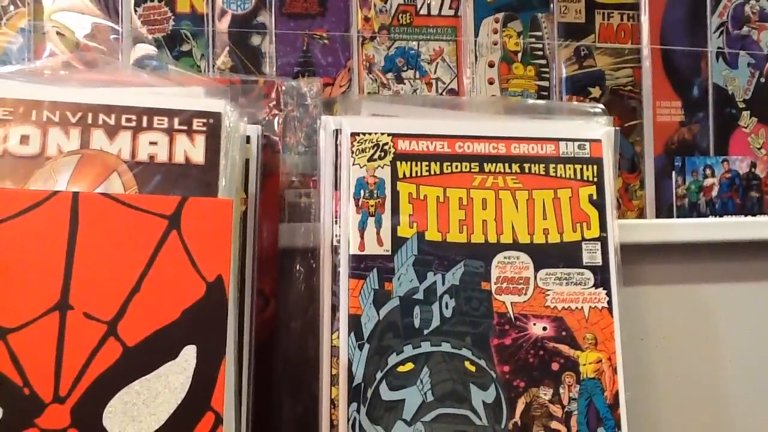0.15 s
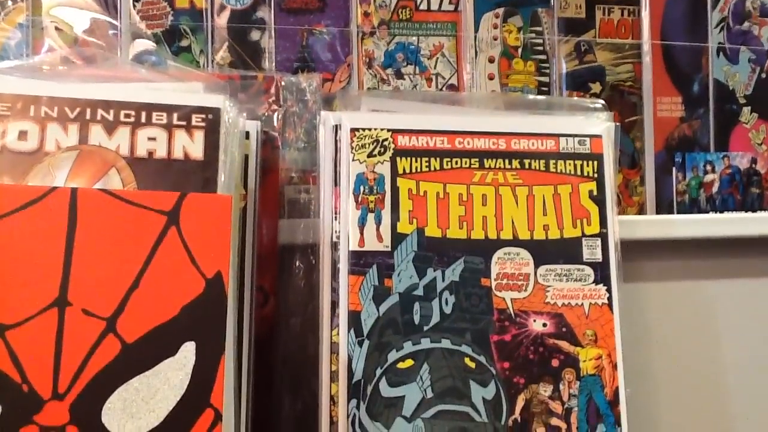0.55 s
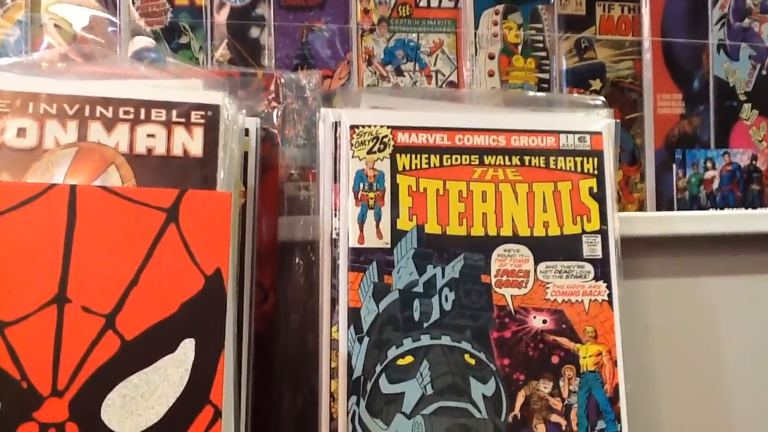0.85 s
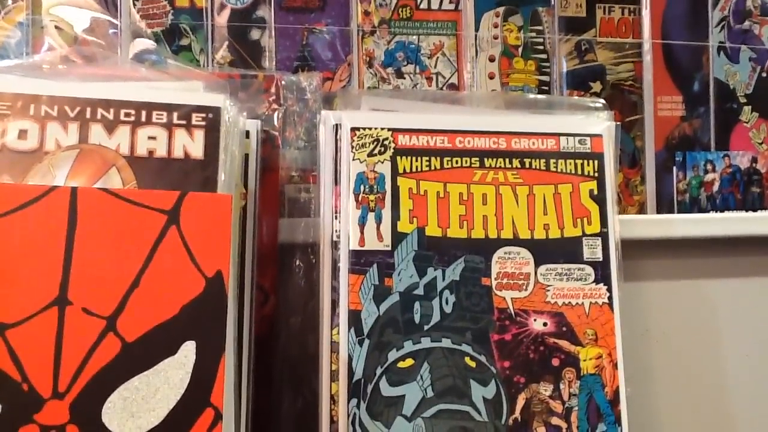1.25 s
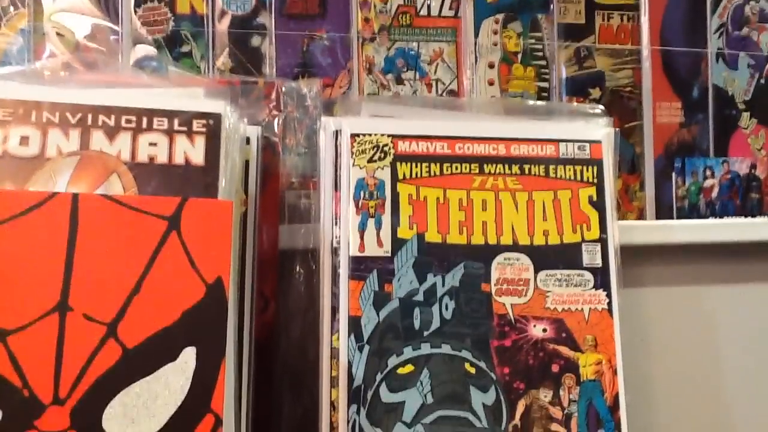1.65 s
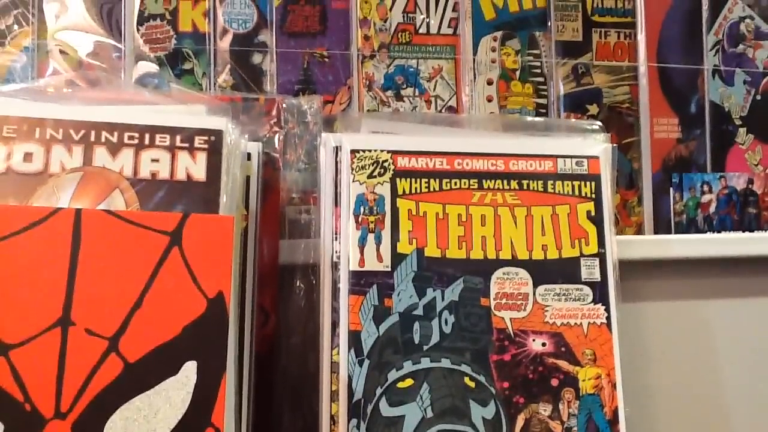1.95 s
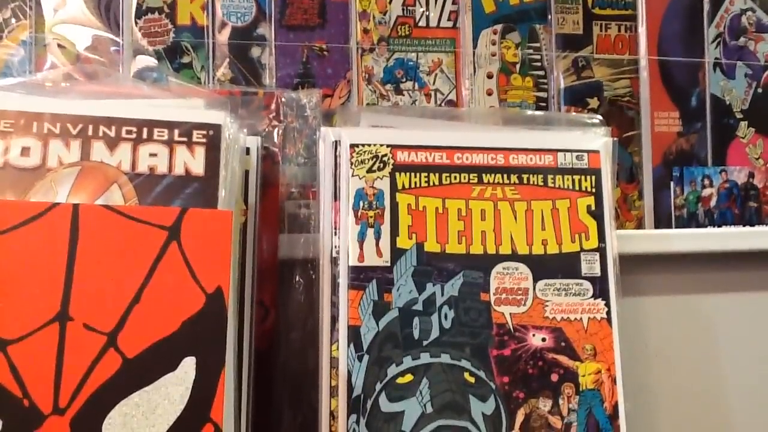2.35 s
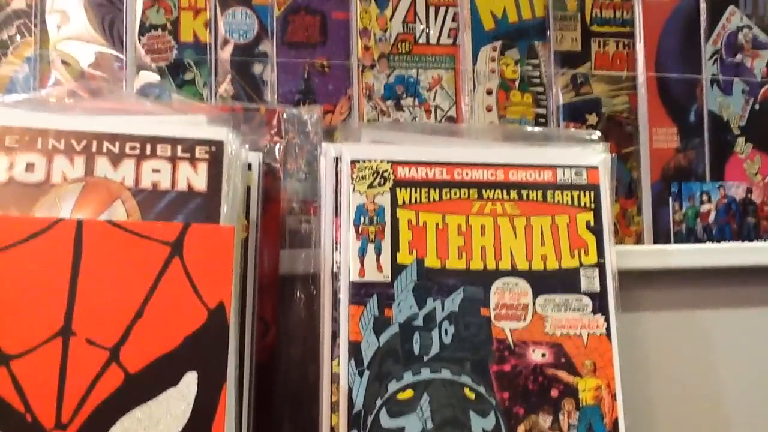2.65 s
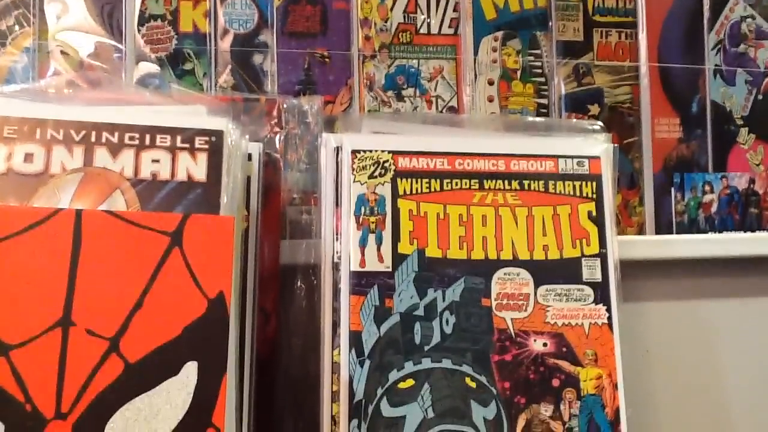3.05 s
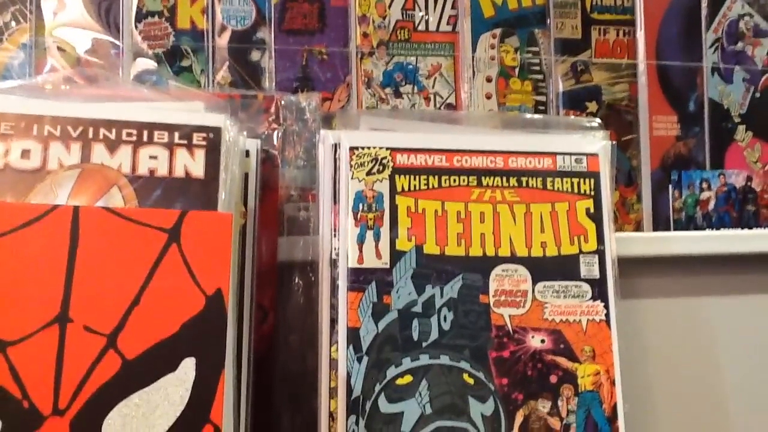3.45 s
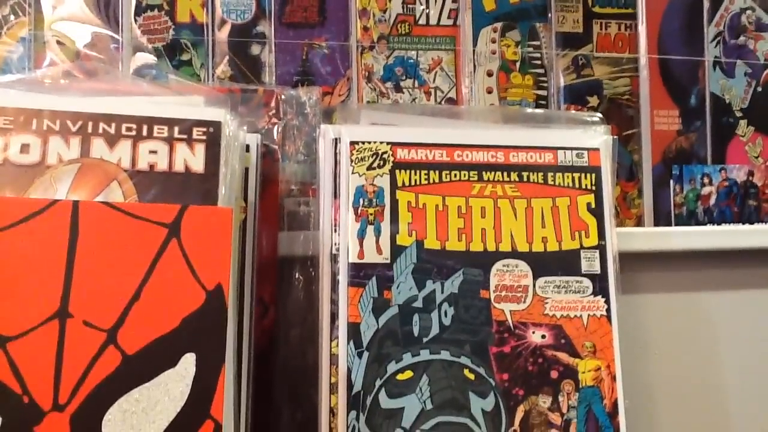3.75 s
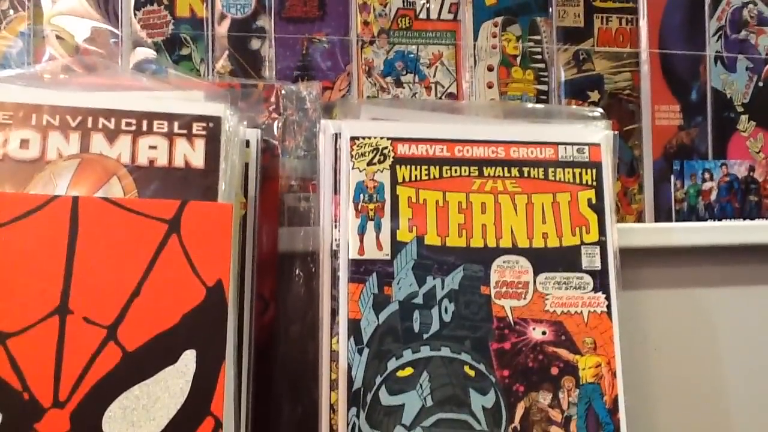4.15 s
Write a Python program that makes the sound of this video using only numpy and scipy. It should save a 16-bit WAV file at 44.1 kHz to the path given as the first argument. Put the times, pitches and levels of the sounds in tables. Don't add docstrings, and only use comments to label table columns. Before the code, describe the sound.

Thin plastic film peels open with hard, sharp snaps and brittle crackles in the first second, then sparse faint rustles, then busier crinkling over a soft hum.

```python
import sys
import numpy as np
from scipy import signal
from scipy.fft import rfft, irfft
from scipy.io import wavfile
from scipy.ndimage import uniform_filter1d

SR = 44100
rng = np.random.default_rng(int(sys.argv[2]) if len(sys.argv) > 2 else 0)


def boost(x):
    u = np.asarray(x, float) / 20
    return 10 ** u


def put_to_file(sound):
    columns = np.atleast_2d(sound).T
    safe = np.clip(columns, -1, 1)
    whole_steps = np.round(safe * 32767)
    wavfile.write(sys.argv[1], SR, whole_steps.astype(np.int16))


N = 189100

# frequency in Hz, density in dB per Hz.
AIR_SPECTRUM = [(25, -41), (70, -34.5), (150, -17.5), (200, -18.5), (260, -6.5), (340, -17.5), (430, -14),
                (520, -28), (900, -32.5), (2000, -38), (4000, -41), (15200, -39)]
AIR_DB = -56
# frequency in Hz, level in dB, wander of the pitch in Hz.
HUM_TONES = [(269, -51, .4), (240, -61.5, .4)]
HUM_WAVER_DB = 1.2
# low edge in Hz, high edge in Hz, level in dB.
MIDDLE_PATCHES = [(2356, 3400, -4.5), (3160, 4980, -1), (4500, 6270, -1), (5250, 5500, -10.5)]
TREBLE_PATCHES = [(6780, 9020, 0.9), (8700, 11600, -2.1), (10920, 13500, -1.5), (13000, 20000, -1.5)]
BODY_PATCHES = [(300, 470, 1.3), (470, 730, 4.0), (794, 1390, 1.0), (1310, 2800, 0.89)]
# start in seconds,
# hold in seconds, rustle level in dB, treble in dB re middle, body in dB re middle.
FLAP_STROKES = [(0, 0.19, -61, 1, 1), (0.236, 0.071, -54.5, -0.5, -6), (0.308, 0.018, -61, 1, -5),
                (0.333, 0.15, -49.5, 3, -9.5), (0.48, 0.096, -53, 5, -4.5), (0.523, 0.015, -48, 1, -15),
                (0.575, 0.06, -61, 1, -13), (0.656, 0.052, -71.5, -18, 3), (0.721, 0.019, -55, -8, 1),
                (0.855, 0.025, -60, 7, -6), (0.912, 0.032, -67.5, 1, -2), (0.947, 0.018, -72, -6, 5),
                (0.996, 0.031, -59.5, 1, -18), (1.203, 0.018, -61.5, -6.5, -3),
                (1.291, 0.038, -67.5, -4, -5.5), (1.348, 0.026, -58, -7, -6.5),
                (1.47, 0.048, -54.5, -22, -14), (1.523, 0.055, -61.5, -0.5, -17),
                (1.714, 0.065, -59, -3.5, -5.5), (1.786, 0.031, -66, -4, -4), (1.824, 0.035, -65, -2, -1),
                (1.89, 0.012, -55.5, -2.5, -9.5), (2.009, 0.014, -63, -0.5, -1)]
SLEEVE_STROKES = [(2.196, 0.015, -71, -13, -13.5), (2.276, 0.01, -63.5, -3.5, -19),
                  (2.334, 0.016, -62.5, -2, -10), (2.416, 0.012, -68, -1, -14),
                  (2.474, 0.0064, -56.5, -9, -10), (2.508, 0.018, -59.5, -6, -9.5),
                  (2.557, 0.014, -68, -8, -9), (2.58, 0.01, -60, -5, -8), (2.651, 0.0061, -64.5, -4, -24),
                  (2.738, 0.0056, -59.5, 1, -8), (2.788, 0.2, -73, 4.5, 0.5), (3.046, 0.061, -54.5, 1, -3),
                  (3.147, 0.032, -58, -1, 8), (3.218, 0.015, -59, 2, 11), (3.243, 0.044, -55, 6.5, -9),
                  (3.361, 0.027, -54.5, 0.5, -4), (3.44, 0.069, -60, -0.5, -1), (3.53, 0.045, -71, 8.5, 7),
                  (3.652, 0.064, -62.5, 1, 4), (3.739, 0.073, -65, 2, 2.5), (3.852, 0.04, -58.5, 1, 0.5),
                  (3.938, 0.061, -59.5, 3, 0.5), (4.015, 0.045, -56, 3.5, -19),
                  (4.076, 0.067, -65.5, 4.5, 2), (4.148, 0.013, -50, -8, -12), (4.18, 0.11, -61.5, 1, -4)]
# levels of middle, treble and body in dB.
REST_LEVELS_DB = [-70, -83, -88.5]
# start in seconds, level in dB, t60 in seconds.
SHIVERS = [(0.578, -38, 0.027), (0.6108, -51, 0.079), (0.722, -39, 0.037), (0.8544, -42, 0.079),
           (.999, -32, 0.087), (1.189, -58, .05), (1.431, -61, 0.032), (2.302, -57.5, .05),
           (2.368, -49, 0.065), (2.404, -47.5, 0.047), (2.427, -55, 0.047), (3.869, -44.5, 0.045),
           (3.964, -37.5, 0.031), (4.177, -42, 0.044), (4.024, -46, .04)]
# time of the peak in seconds, peak in dB, frequency in Hz.
TAPS = [(.049, -51, 162), (.0578, -48.5, 1630), (.124, -49, 402), (.262, -31.5, 1380), (.29, -52, 400),
        (.315, -39, 424), (.335, -48, 1290), (.353, -47, 400), (.367, -59, 162), (.492, -50, 180),
        (.495, -59, 700), (.549, -53, 397), (.613, -58, 160), (0.661, -53, 162), (.722, -37.5, 1220),
        (.9962, -29, 1150), (.731, -57, 164), (.844, -43, 1320), (0.8546, -40, 912), (.855, -25.5, 1460),
        (.966, -53, 710), (0.9971, -41, 374), (1.024, -50, 1300), (1.366, -54.5, 705), (2.297, -50, 402),
        (2.315, -53, 407), (2.408, -56, 705), (2.431, -56, 950), (3.045, -46.5, 1050), (3.069, -53, 450),
        (3.132, -52, 1300), (3.161, -51, 1110), (3.189, -50, 1090), (3.209, -54, 694), (3.226, -48, 900),
        (3.233, -46, 596), (3.241, -50, 1000), (3.176, -47, 560), (3.324, -55, 700), (3.343, -51.5, 1200),
        (3.424, -54, 700), (3.563, -49.5, 1620), (3.695, -49, 1200), (3.791, -48, 704), (3.889, -42.5, 388),
        (3.889, -45, 704), (3.891, -42.5, 204), (3.936, -50, 362), (3.968, -55, 160), (3.98, -44.5, 410),
        (4.01, -57, 420), (4.006, -47.5, 169), (4.043, -44, 168), (4.05, -40, 330), (4.069, -50, 390),
        (4.078, -45, 403), (4.084, -48.5, 131), (4.135, -49, 990), (4.155, -40.5, 750), (4.272, -55, 450)]
# time in seconds, peak in dB, ring in Hz, treble in dB re middle, body in dB re middle.
PEELING_SNAPS = [(0.2406, -24.5, 6700, 6, 14), (0.2617, -19, 3240, -12.5, -10),
                 (0.2647, -19.5, 6360, -10.5, -4), (0.3404, -17, 4330, -13, -1.5),
                 (0.367, -19.5, 5500, 8, -21), (0.4016, -17.5, 3550, -10, -3.5),
                 (0.4067, -18, 4080, -7.5, 3.5), (0.4688, -16, 8640, 7, -10), (0.474, -18, 2630, -10, -7),
                 (0.5346, -26, 5040, -8, 5), (.557, -4.5, 4700, -5.5, -12.5),
                 (0.5792, -5.5, 5250, -12.5, -6), (0.6085, -1, 5330, -5.5, -8.5),
                 (0.6117, -19.5, 7570, 10, -18), (.659, -26, 2440, -15.5, 0.5),
                 (0.7206, -1, 5760, -1.5, -25.5), (0.7253, -18, 6060, 1, -9),
                 (0.7799, -32, 4360, -15.5, -15), (0.8523, -15, 8300, 2.5, -21.5),
                 (0.8538, -7, 3100, -4.5, -5), (0.8535, 1.5, 12100, -3, -8), (0.9961, 1, 3400, -8, -10.5),
                 (0.9972, -10.5, 5500, -11, -8), (0.9981, -9, 5220, -4, -8.5),
                 (0.9978, -1.5, 4560, -8.5, -12.5), (1.0032, -2.5, 3380, -9.5, -22.5),
                 (1.4513, -19.5, 8050, -7, -35)]
OPENING_SNAPS = [(3.0987, -21, 3140, -11, -1.5), (3.1178, -23.5, 4070, -3, -5), (3.155, -15, 4200, -4, 4.5),
                 (3.3059, -14.5, 5800, -7, -1.5), (3.369, -23, 5330, 1, 2), (3.4105, -22, 2300, -13, -2),
                 (3.413, -14.5, 6900, 2, -1.5), (3.4423, -18, 2440, -2, -4), (3.458, -23.5, 7490, 0, 2),
                 (3.5108, -25.5, 4730, -13, -9), (3.7798, -25, 5360, -1, -24), (3.8604, -22, 2900, -7, -16),
                 (3.8674, -13.5, 7260, -3.5, -2), (3.963, -13.5, 7850, -2.5, -1.5),
                 (3.9668, -23.5, 3170, -21, -2), (4.0235, -19.5, 6650, -5.5, -4),
                 (4.0254, -21, 5400, -2, -29), (4.0504, -26, 7670, 13, 5), (4.1347, -11.5, 6900, 2, -10),
                 (4.14, -25, 8800, 7, -13), (4.147, -15, 5140, -6, -18), (4.1496, -12.5, 2950, -5, 1),
                 (4.153, -16, 5700, 1, 5), (4.1758, -15.5, 6240, 3, 2)]
FURTHER_SLIPS = [(0.261, -21.5, 5700, -14, -8), (0.2617, -15, 3580, -4, -10), (.264, -24.5, 2030, -13, 5),
                 (.4010, -24, 3470, -15, -6), (.5869, -29, 9000, 6, -8), (0.8518, -11, 4970, -4, -18),
                 (1.0307, -42, 4500, -9, -11), (1.5372, -40.5, 3520, -17, -17), (1.9028, -44, 9000, 3, -14),
                 (2.368, -50, 9000, 3, -14), (3.073, -27, 5500, -2, -10), (3.079, -36, 3300, -7, -12),
                 (3.0973, -26.5, 5000, -8, -20), (3.1547, -22.5, 5100, -8, -6),
                 (3.1829, -41, 3500, -12, -8), (3.229, -38, 6500, 1, -17), (3.2896, -41, 9000, 6, -14),
                 (3.3906, -37, 4500, -4, -10), (3.8875, -43, 8000, 2, 6), (4.0316, -35, 6500, -1, -14),
                 (4.1567, -25, 4000, -8, -10), (4.1845, -36, 5000, -4, -10), (4.214, -38, 3520, -12, -10),
                 (4.2464, -36, 5500, -8, -12)]
# time in seconds, peak in dB, ring in
# Hz, treble in dB re middle.
GLUE_TICKS = [(0.0576, -42, 1910, -10), (0.324, -28, 2870, -6), (0.3902, -35, 4090, -14),
              (0.3982, -29, 5700, -10), (0.4098, -22.5, 7600, -14), (0.4777, -29, 3570, -12),
              (.489, -27.5, 3300, -15), (0.542, -25, 4900, -19), (0.5455, -17, 5340, -4),
              (0.548, -23, 7320, -4), (0.582, -12, 5990, 5), (0.714, -38.5, 2860, -19),
              (0.7287, -21, 4520, 6), (0.7565, -28, 2670, -5), (0.8358, -26, 2390, -10.5),
              (0.8433, -32, 2900, -18), (0.861, -16, 9100, 14), (0.9658, -44, 2600, -20),
              (1, -11.5, 6100, 10), (1.074, -40.5, 4970, -4.5), (1.1396, -36.5, 3450, -28),
              (1.209, -37, 2840, 1), (1.4162, -41, 4000, -20), (1.4302, -24.5, 2760, 1),
              (1.457, -31.5, 2630, -6), (1.4663, -32, 3680, -35), (1.8315, -40, 6550, -19),
              (1.852, -41, 6000, -11), (1.9055, -29.5, 2710, 4), (2.828, -42, 2980, -12)]
CREASE_TICKS = [(2.3697, -49, 4500, -12), (2.4027, -28, 8000, -16), (2.406, -28, 6340, -1),
                (2.431, -40, 4720, -9), (2.4809, -33, 3450, -4), (3.4232, -33, 3010, -20),
                (3.6888, -35, 4330, -11), (3.039, -35, 4670, -11), (3.0506, -27, 6370, -11.5),
                (3.0705, -24, 6420, -1), (3.109, -34, 7240, 2), (3.158, -25, 7140, 2),
                (3.1725, -33.5, 3550, -24), (3.254, -28.5, 3340, -3), (3.4781, -26.5, 4260, -54),
                (3.4842, -32, 4580, -8), (3.661, -28, 4300, -6.5), (3.8634, -26, 4400, 1),
                (3.3227, -32.5, 3140, -13), (3.9454, -32.5, 8700, -14), (3.972, -27, 2900, 1),
                (3.9997, -26, 6630, -6), (4.053, -28, 5250, -3), (4.081, -31.5, 4800, -20),
                (4.169, -25, 6500, -8), (4.1806, -28.5, 2680, -21), (4.2106, -24, 4760, -1),
                (4.2328, -27.5, 4840, -6), (4.2393, -30.5, 3550, -10), (4.2434, -21, 5770, -4),
                (.959, -48, 3030, -24), (.7343, -21.5, 4500, -5), (.7545, -38, 3000, -12),
               (0.7603, -33, 4500, -8.5), (1.19, -41, 6000, 1), (1.2658, -47, 5000, -10.5),
               (1.364, -48, 4000, -10), (1.4193, -30.5, 6000, -5), (1.4215, -41, 4000, -10),
               (1.447, -44, 3500, -22), (1.464, -39, 4000, -19), (1.7892, -42, 3990, -8),
               (2.3033, -44, 3940, -7.5), (2.5274, -48, 4500, -8), (2.6104, -43, 6000, 4),
               (2.736, -42, 4500, -7), (3.132, -41, 3970, -11), (3.6956, -36, 4500, -16),
               (4.223, -36, 7000, -3), (4.2872, -46, 5050, -3)]
# frequency in Hz, t60 in seconds.
ROOM_DECAY = [(300, 0.23), (1500, 0.048), (4000, 0.03), (12000, 0.079)]
# time in seconds, level in dB, frequency in Hz, # t60 in
# seconds.
KNOCKS = [(0.265, -30, 300, 0.032), (0.314, -25, 1020, 0.012), (.405, -27, 610, 0.016),
          (.471, -32, 722, 0.023), (.718, -32, 584, 0.023), (0.579, -34, 280, 0.021),
          (.852, -34.5, 346, 0.031), (0.9948, -20.5, 594, 0.017), (1.016, -36.5, 246, 0.054),
          (1.211, -43, 246, 0.046), (1.452, -52.5, 574, 0.05), (1.8, -56, 419, 0.13),
          (1.87, -54, 332, 0.24), (2.305, -53.5, 289, 0.091), (2.31, -57, 587, 0.062),
          (2.479, -49, 432, 0.044), (3.153, -47, 610, 0.043), (3.17, -55, 930, 0.11),
          (3.222, -57, 596, 0.048), (3.235, -51, 1066, 0.07), (3.76, -37, 285, 0.026),
          (3.86, -28.5, 956, 0.016), (3.962, -51, 605, 0.017), (3.99, -57, 196, 0.26),
          (4.006, -37.5, 280, 0.052), (4.04, -51, 381, 0.18), (1.92, -51, 373, .1),
          (4.043, -43, 270, 0.062), (4.064, -42.5, 318, 0.06), (4.17, -58.5, 411.5, 1),
          (4.269, -34, 736, 0.019)]
# dB lost per dB of excess, recovery time in seconds.
DUCK_RECOVERY = [(0.299, 0.1), (0.421, 0.96)]

LEAD = 90
FIRM_DB = -55


def evened(x):
    return x / np.sqrt(np.mean(x ** 2) + 1e-20)


def read(points, hz):
    f, value = np.transpose(points)
    return np.interp(np.log(hz + 1), np.log(f + 1), value)


def add(mix, s, sound):
    part = mix[max(round(s * SR), 0):][:len(sound)]
    part += sound[:len(part)]


def band(x, lo_hz, hi_hz, order=2):
    edges = [lo_hz, min(hi_hz, 0.49 * SR)]
    return signal.sosfilt(signal.butter(order, edges, "band", fs=SR, output="sos"), x)


def slow(hz):
    lowpass = signal.butter(2, hz, fs=SR, output="sos")
    return evened(signal.sosfilt(lowpass, rng.standard_normal(N + SR))[SR:])


def air():
    shape = boost(read(AIR_SPECTRUM, np.fft.rfftfreq(N, 1 / SR)))
    noise = irfft(rfft(rng.standard_normal(N)) * shape, N)
    return boost(AIR_DB + 1.0 * slow(1.2)) * evened(noise)


def hum():
    out = np.zeros(N)
    for hz, db, wander_hz in HUM_TONES:
        level = np.sqrt(2) * boost(db + HUM_WAVER_DB * slow(2.9))
        phase = 2 * np.pi * np.cumsum(hz + wander_hz * slow(19.0)) / SR
        out += level * np.sin(phase)
    return out


def grains(per_s, spread_db, hiss):
    happens = rng.random(N) < per_s / SR
    size = boost(spread_db * np.minimum(rng.exponential(1, N), 4.2)) * happens
    return evened(size * rng.standard_normal(N)) + hiss * rng.standard_normal(N)


def patches(bands, clumps_db):
    total = np.zeros(N)
    for lo_hz, hi_hz, db in bands:
        swell = boost(db + 2.2 * slow(24.0) + clumps_db)
        total += swell * evened(band(grains(1500, 1.1, 1.0), lo_hz, hi_hz))
    return evened(total)


def strokes():
    rise_db_per_s, fall_db_per_s = 1298.5, 650.5
    linger_s = 0.049
    t = np.arange(0, N, 64) / SR
    power = boost(np.array(REST_LEVELS_DB)[:, None] + ducking_db()[::64]) ** 2
    for s, hold_s, db, treble_db, body_db in FLAP_STROKES + SLEEVE_STROKES:
        swell_db = -rise_db_per_s * np.maximum(s - t, 0)
        decay_db = -fall_db_per_s * np.maximum(t - s - hold_s, 0)
        shape_db = (swell_db + decay_db) / (1 + hold_s / linger_s)
        levels_db = db + np.array([[0], [treble_db], [body_db]])
        power = power + boost(levels_db + np.maximum(shape_db, -200)) ** 2
    for s, db, t60 in SHIVERS:
        levels_db = db + np.array([[0], [-2.0], [-12.0]])
        power = power + (t >= s) * boost(levels_db - 60 * np.clip(t - s, 0, 1) / t60) ** 2
    return [np.interp(np.arange(N) / SR, t, np.sqrt(row)) for row in power]


def crackle(level):
    per_s, mean_db, spread_db = 320, 2.5, 5.5
    firmness = (level / boost(FIRM_DB)) ** 0.19
    size = level * firmness * boost(mean_db + spread_db * np.minimum(rng.exponential(1, N), 1.8))
    size *= rng.random(N) < per_s / SR
    rings_hz = np.geomspace(2400, 7000, num=12)
    kind = rng.integers(0, len(rings_hz), N)
    chance = rng.standard_normal((len(rings_hz), 2 * LEAD))
    out = np.zeros(N)
    for k, (hz, row) in enumerate(zip(rings_hz, chance)):
        out += signal.oaconvolve(size * (kind == k), snap(hz, -7.5, -5.5, row))[:N]
    return out


def rustle():
    middle, treble, body = strokes()
    clumps_db = 1.2 * slow(50)
    top = treble * (middle / boost(FIRM_DB - 6.5)) ** -0.25
    out = patches(MIDDLE_PATCHES, clumps_db) * middle
    out += crackle(middle * boost(clumps_db))
    out += boost(-3.0) * patches(TREBLE_PATCHES[:2], clumps_db) * treble
    out += boost(-4.5) * patches(TREBLE_PATCHES[2:], clumps_db) * top
    return out + patches(BODY_PATCHES, 0.5 * clumps_db) * body


def taps():
    peak_cycles = 1.16
    out = np.zeros(N)
    for s, db, hz in TAPS:
        turns = np.arange(round(8 * peak_cycles / hz * SR)) * hz / SR
        envelope = turns / peak_cycles * np.exp(1 - turns / peak_cycles)
        add(out, s - peak_cycles / hz, boost(db) * envelope * np.sin(2 * np.pi * turns))
    return out


def snap(ring_hz, treble_db, body_db, chance):
    t = (np.arange(len(chance)) - LEAD) / SR
    hz = np.fft.rfftfreq(1024, 1 / SR)
    envelope = np.where(t > 0, 0.28 * np.exp(-t / 0.00041), 0.03 * np.exp(t / 0.00094))
    slips = np.clip(chance, -2, 2) ** 3 * envelope
    slips[LEAD] += 2
    plain_db = read([(250, body_db - 15.5), (1100, body_db - 4.5), (1900, body_db - 5.5),
                     (2400, -3.0), (4600, -5.0), (7000, -4.0 + 0.46 * min(treble_db + 3.5, 0)),
                     (9000, treble_db), (15000, treble_db - 5.0)], hz)
    resonance = 0.98 / (1 + ((hz - ring_hz) / (0.11 * ring_hz)) ** 2)
    colour = boost(plain_db) + resonance
    colour /= np.sqrt(uniform_filter1d(abs(rfft(slips, 1024)) ** 2, size=37))
    log_gain = np.log(np.concatenate([colour, colour[-2:0:-1]]))
    causal = np.fft.ifft(np.exp(np.conj(signal.hilbert(log_gain)))).real[:512]
    sound = np.convolve(slips, causal)
    return sound / abs(sound).max()


def snaps():
    rows = PEELING_SNAPS + OPENING_SNAPS
    rows = rows + [(*row, 1 + 0.61 * row[-1]) for row in GLUE_TICKS]
    rows = rows + [(*row, -4.5) for row in CREASE_TICKS] + FURTHER_SLIPS
    out, sent = np.zeros(N), np.zeros(N)
    chance = rng.standard_normal((len(rows), 2 * LEAD))
    for (s, db, ring_hz, treble_db, body_db), row in zip(rows, chance):
        sound = boost(db) * snap(ring_hz, treble_db, body_db, row)
        add(out, s - LEAD / SR - 0.0001, sound)
        add(sent, s - LEAD / SR, sound * boost(-0.2 * max(db + 10.0, 0)))
    return out, sent


def room(x):
    out = np.zeros(N)
    turn = np.arange(N) * np.pi * 23 / SR
    start = np.arange(SR // 3) / SR
    for k in range(3):
        echoes = rng.standard_normal(SR // 3) * (start > 0.0012) * (rng.random(SR // 3) < 0.3)
        hz, t, z = signal.stft(echoes, SR, nperseg=64)
        decay = boost(-60 * t / read(ROOM_DECAY, hz)[:, None])
        tail = signal.istft(z * decay, SR, nperseg=64)[1]
        share = np.sqrt(2 / 3) * np.cos(turn + k * np.pi / 3)
        out += signal.oaconvolve(x * share, tail / np.linalg.norm(tail))[:N]
    return out


def knocks():
    out, t = np.zeros(N), np.arange(6000) / SR
    chance = rng.standard_normal((len(KNOCKS), 6000))
    for (s, db, hz, t60), row in zip(KNOCKS, chance):
        rattle = 0.88 * evened(band(row, 0.54 * hz, 1.15 * hz))
        ring = np.sin(2 * np.pi * hz * t) + rattle
        soft_start = 1 - np.exp(-(t / 0.0049) ** 2)
        add(out, s - 0.002, boost(db - 60 * t / t60) * 2 * soft_start * ring)
    return out


def ducking_db():
    threshold_db, attack_s = -6, 0.085
    out = np.zeros(N)
    for s, db, *_ in PEELING_SNAPS:
        if db > threshold_db:
            t = np.maximum(np.arange(N) / SR - s, 0)
            back = sum(share * np.exp(-t / back_s) for share, back_s in DUCK_RECOVERY)
            out -= (db - threshold_db) * (1 - np.exp(-t / attack_s)) * back
    return out


def scene():
    cracks, sent = snaps()
    echo = boost(-9.0) * band(room(sent), 1150, 20300, order=1)
    handling = band(cracks + echo + rustle() + knocks() + taps(), 123.0, 20000)
    steady = (hum() + air()) * boost(ducking_db())
    return (handling + steady)[None]


def top_cut(x):
    return signal.sosfilt(signal.butter(12, 16800, fs=SR, output="sos"), x)


def record(dry):
    edge_hz = 15300
    hz = np.fft.rfftfreq(N, 1 / SR)
    top_db = np.interp(hz, [0, edge_hz - 130, edge_hz + 150, 16750, 16850],
                       [-0.5, -1.0, -39.5, -35.0, -114])
    mix = irfft(rfft(dry) * boost(top_db), N)
    return top_cut(mix)


dry = scene()
out = record(dry)
put_to_file(out)
```